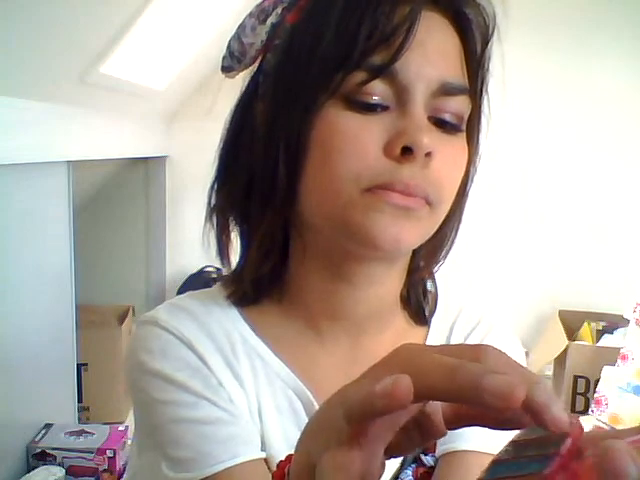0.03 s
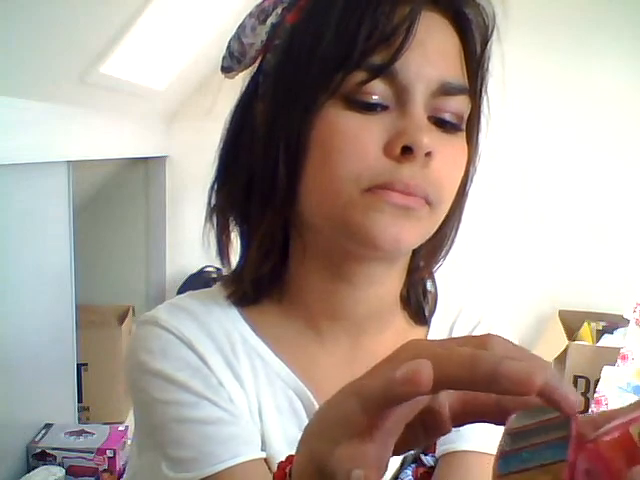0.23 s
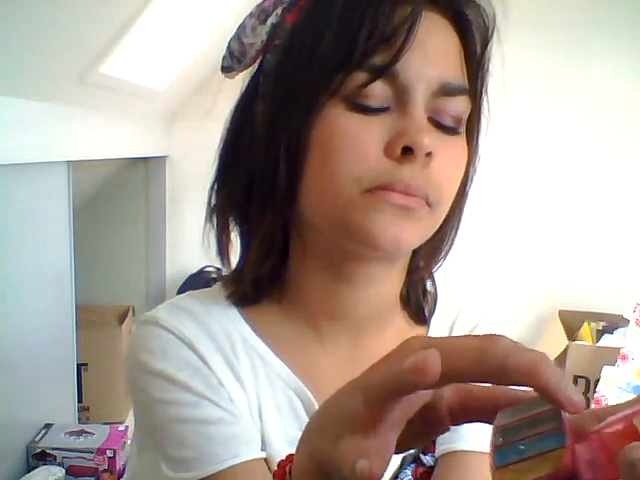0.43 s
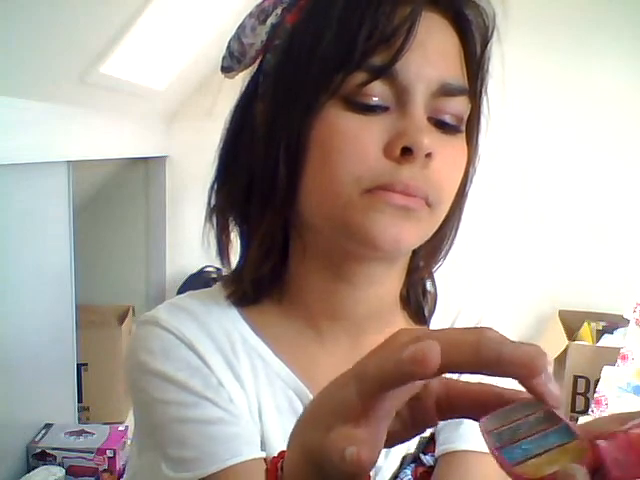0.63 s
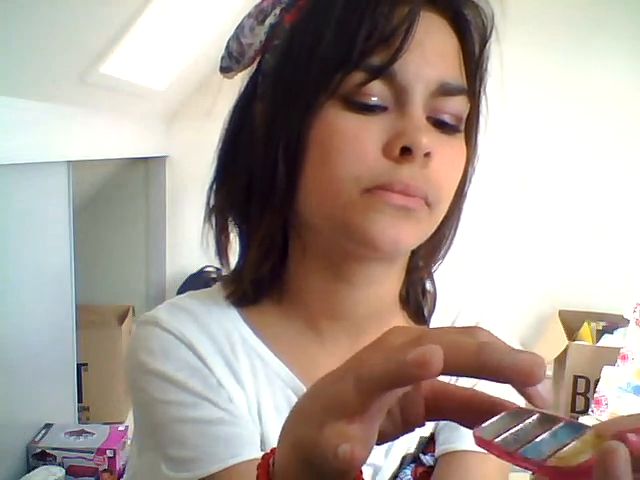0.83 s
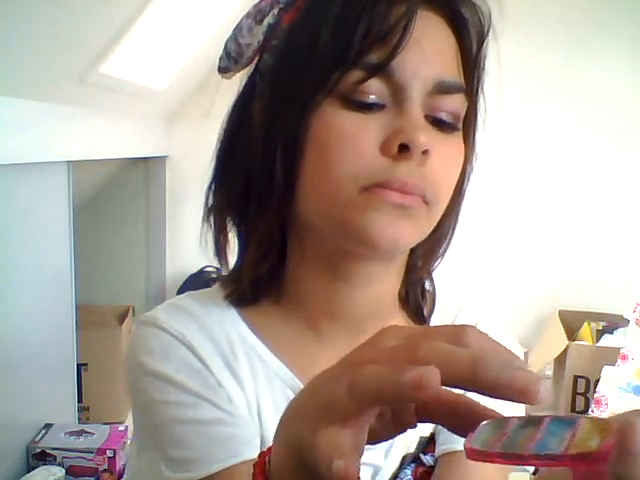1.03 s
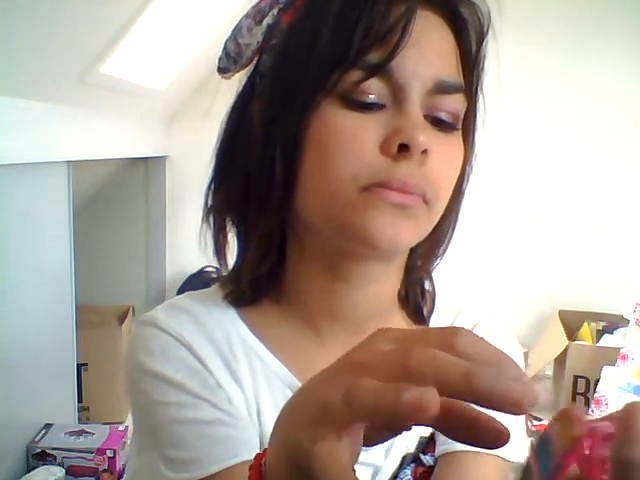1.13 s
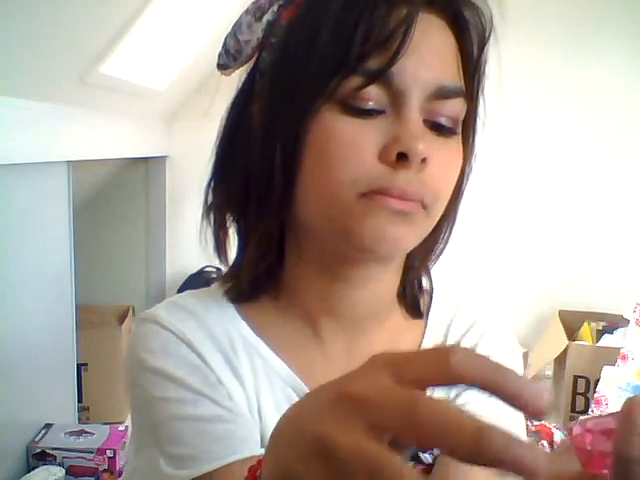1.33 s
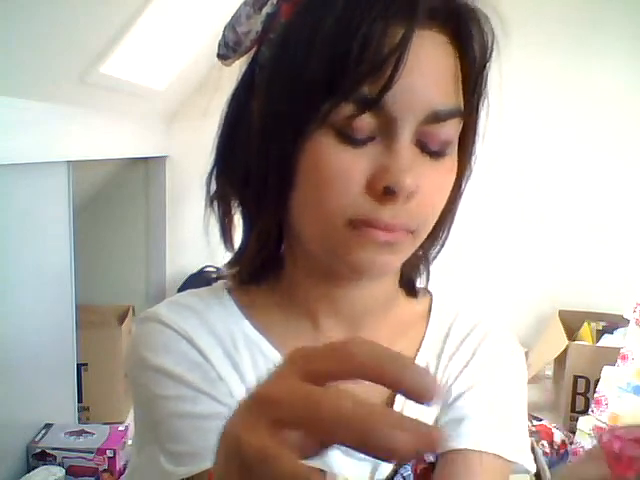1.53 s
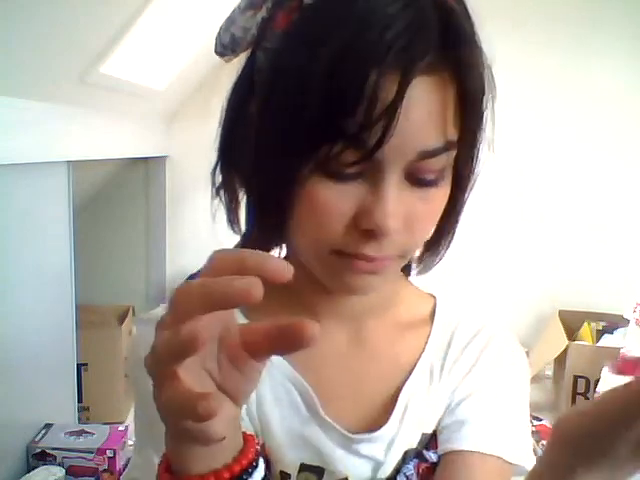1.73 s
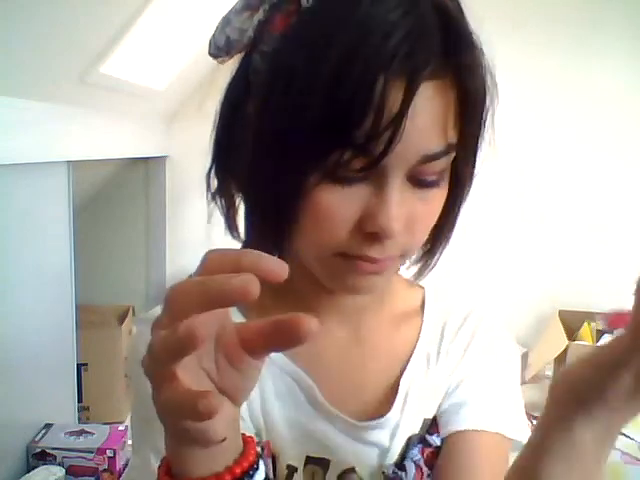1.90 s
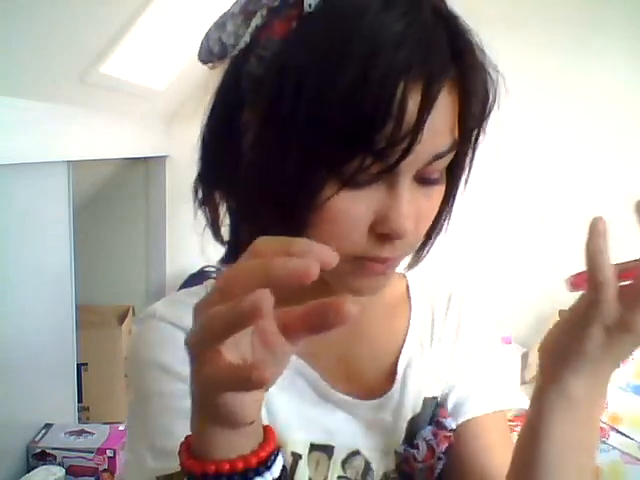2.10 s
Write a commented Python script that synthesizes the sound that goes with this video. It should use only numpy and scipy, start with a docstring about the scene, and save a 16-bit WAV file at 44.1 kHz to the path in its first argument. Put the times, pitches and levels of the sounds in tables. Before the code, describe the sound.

Plastic case clicks open and a loose hard piece drops sharply on a desk, rattling briefly

```python
"""At a desk in a small room, a small plastic compact snaps open near a webcam microphone; a piece drops
on the desk and bounces to rest. Blows ring decaying modes plus short noise, with a desk thud under them.
Sparse reflections form the room; a suppressor shortens the tails. Microphone hiss, a faint whine and
subsonic drift lie beneath, and the loudest blow clips."""
import sys
import numpy as np
from scipy import signal
from scipy.fft import rfft, irfft
from scipy.io import wavfile
from scipy.ndimage import uniform_filter1d

SR = 44100
rng = np.random.default_rng(int(sys.argv[2]) if len(sys.argv) > 2 else 0)


def rack_gain(trim_db):
    """Turn a fader trim in dB into the linear factor to multiply a signal by."""
    fader = np.asarray(trim_db, float)
    return 10 ** (fader / 20)


def dump(signal):
    """Clip the signal to [-1, 1] and save it as 16-bit WAV at the path in sys.argv[1]."""
    limited = np.clip(np.atleast_2d(signal).T, -1, 1)
    pcm = np.round(limited * 32767).astype(np.int16)
    wavfile.write(sys.argv[1], SR, pcm)


N = 95300
STRIKE_N = 4000  # samples per blow


def read(points, hz):
    """Interpolates a table on a log-frequency axis."""
    f, value = np.transpose(points)
    return np.interp(np.log(hz + 1), np.log(f + 1), value)


def add(mix, start_s, sound):
    """Mixes a sound in at a time."""
    part = mix[round(start_s * SR):][:len(sound)]
    part += sound[:len(part)]


def causal(db):
    """Minimum-phase filter with the given gain at 1025 evenly spaced frequencies, cut to 1024 taps."""
    log_gain = np.log(rack_gain(np.r_[db, db[-2:0:-1]]))
    return np.fft.ifft(np.exp(np.conj(signal.hilbert(log_gain)))).real[:1024]


def highs(x, low_hz):
    """Third-order high-pass: small objects radiate little below low_hz."""
    return signal.sosfilt(signal.butter(3, low_hz, "high", fs=SR, output="sos"), x)


def hiss():
    """Microphone and converter noise: shaped Gaussian noise with a steep upper edge."""
    # spectrum before scaling to the total rms: freq_hz, relative_level_db
    spectrum = [(18, -37.5), (30, -1.5), (59, -7), (71, -16), (92, -8.5), (268, -13), (1080, -21),
                (1220, -22), (1310, -24.5), (5540, -39), (7860, -40), (10200, -83.5), (17300, -120)]
    rms_db, edge_hz = -61, 7400
    hz = np.fft.rfftfreq(N, 1 / SR)
    white = rfft(rng.standard_normal(N))
    wash = irfft(white * rack_gain(read(spectrum, hz)) / (1 + (hz / edge_hz) ** 200), N)
    return rack_gain(rms_db) * wash / np.sqrt(np.mean(wash ** 2) + 1e-20)


def whine():
    """Faint sine whose phase wanders at random."""
    pitch_hz, peak_db = 1214, -80.5
    wobble_rad = np.cumsum(rng.standard_normal(N)) * 0.014
    return rack_gain(peak_db) * np.sin(2 * np.pi * pitch_hz * np.arange(N) / SR + wobble_rad)


def subsonic_drift():
    """Narrow-band subsonic noise, levelled locally and then following an envelope."""
    # envelope of the drift: time_s, rms_db
    envelope = [(0.0, -67), (0.05, -52.5), (0.17, -69), (0.29, -51), (0.5, -65.5), (1.01, -52.5),
                (1.23, -49.5), (1.31, -65), (1.55, -44.5), (1.87, -67), (2.11, -53), (2.16, -57.5)]
    low_hz, high_hz = 6, 12
    hz = np.fft.rfftfreq(N, 1 / SR)
    drift = irfft(rfft(rng.standard_normal(N)) * (hz > low_hz) * (hz < high_hz), N)
    drift = drift / np.sqrt(uniform_filter1d(drift ** 2, 9000))
    return rack_gain(np.interp(np.arange(N) / SR, *np.transpose(envelope))) * drift


def room(x):
    """Sparse reflections that arrive after a short gap, each band dying at its own speed."""
    # decay of the small room: freq_hz, t60_s
    decay = [(100, 0.1), (500, 0.25), (1500, 0.25), (4000, 0.26), (7500, 0.24)]
    level_db, delay_s, rise_s = -6, 0.0042, 0.024
    taps = np.zeros(SR // 2)
    at = np.arange(0, SR // 2 - 12, 12)
    taps[at + rng.integers(0, 12, len(at))] = rng.choice([-1., 1.], len(at))
    hz, t, z = signal.stft(taps, SR, nperseg=256)
    tail = signal.istft(z * rack_gain(-60 * t / read(decay, hz)[:, None]), SR, nperseg=256)[1]
    tail = tail * np.clip((np.arange(len(tail)) / SR - delay_s) / rise_s, 0, 1)
    return rack_gain(level_db) * signal.fftconvolve(x, tail / np.linalg.norm(tail))[:N]


def ring(modes, longest_s):
    """Sum of dying sines; each blow draws slightly different mode levels and pitches."""
    level_spread_db, detune_spread = 1.2, .01  # standard deviations; detune as a fraction
    hz, db, t60_s = np.transpose(modes)[:, :, None]
    t = np.arange(STRIKE_N) / SR
    luck_level, luck_pitch = rng.standard_normal((2, len(modes), 1))
    fade = rack_gain(db + level_spread_db * luck_level - 60 * t / np.clip(t60_s, .004, longest_s))
    return (fade * np.sin(2 * np.pi * hz * (1 + detune_spread * luck_pitch) * t)).sum(0)


def desk_thud(push):
    """The push excites the desk modes; scaled to peak 1."""
    # desk modes, decays limited to 4-50 ms by ring(): freq_hz, relative_level_db, t60_s
    desk = [(114, -11.5, 0.063), (250, -20.5, .035), (346.5, -13, .03), (452, -3, .05), (495, 4.5, 0.055),
            (600, 3.5, .03), (700, -5, 0.027), (781, -15, 0.01)]
    thud = signal.fftconvolve(push[:1000], ring(desk, longest_s=.05))[:STRIKE_N]
    thud = highs(thud, 140)
    return thud / abs(thud).max()


def plastic_body(modes, push):
    """The contact and its tiny after-slips ring the plastic; loose parts rattle without pitch."""
    slips_per_s, slip_db = 4000, -7.5  # slips relative to the first contact
    rattle_db, rattle_t60_s = -9, .04
    size, buzz = rng.standard_normal((2, STRIKE_N))
    t = np.arange(STRIKE_N) / SR
    slips = rack_gain(slip_db) * push * size * (rng.random(STRIKE_N) < slips_per_s / SR)
    taps = np.where(t > 0, slips, 1)[:1000]
    body = signal.fftconvolve(taps, ring(modes, longest_s=.03))[:STRIKE_N]
    rattle = (push + rack_gain(-1 - 60 * t / rattle_t60_s)) * buzz
    return body / abs(body).max() + rack_gain(rattle_db) * rattle


def strike(modes, peak_db, bright_hz, contact_s, thud_db):
    """Plastic and desk thud of one blow. Row 0 goes to the microphone; row 1, evened in colour as a
    sum over directions, goes to the walls."""
    rise_s, focus_db_per_oct, plastic_low_hz = 0.00013, 7.5, 990
    even_share, thud_to_walls_db = .55, -1.5
    t = np.arange(STRIKE_N) / SR
    push = np.exp(-t / max(contact_s, 1e-4)) * np.minimum(t / rise_s + 0.35, 1)

    hz = np.fft.rfftfreq(2048, 1 / SR) + 20
    colour = causal(-focus_db_per_oct * abs(np.log2(hz / bright_hz)))
    sound = signal.fftconvolve(plastic_body(modes, push), colour)[:STRIKE_N]
    sound = highs(sound, plastic_low_hz)
    sound = sound / abs(sound).max()

    even = highs(np.r_[colour, np.zeros(STRIKE_N - len(colour))], plastic_low_hz)
    even = even * np.linalg.norm(sound) / np.linalg.norm(even)  # same energy as the direct sound
    spread = even_share * even + (1 - even_share) * sound

    thud_gain = rack_gain(thud_db + np.array([[0], [thud_to_walls_db]]))
    return rack_gain(peak_db) * (np.array([sound, spread]) + thud_gain * desk_thud(push))


def add_strikes(near, walls, modes, blows):
    """Adds each blow to the direct sound and to the sound sent to the walls."""
    for start_s, *settings in blows:
        direct, spread = strike(modes, *settings)
        add(near, start_s, direct)
        add(walls, start_s, spread)


def latch(near, walls):
    """The compact snaps open: latch clicks ring its plastic case."""
    # clicks: start_s, plastic_peak_db, brightest_hz, contact_decay_s, thud_db (re plastic peak)
    clicks = [(1.2412, -13.5, 1800, .0004, -37), (1.2485, -23.5, 1600, 0.0024, -25),
              (1.258, -14, 4600, 0.0014, -29), (1.2637, -23, 7000, 0.00092, -26)]
    # case modes, decays limited to 4-30 ms by ring(): freq_hz, relative_level_db, t60_s
    case = [(1720, -3, 0.025), (2197, -6, .015), (3307, -10, .01), (4500, -2, 0.012), (5520, -10.5, 0.0053),
            (6300, -7, 0.016), (7470, 2.5, 0.0104)]
    add_strikes(near, walls, case, clicks)


def dropped_piece(near, walls):
    """The piece bounces to rest: each blow on the desk rings its plastic."""
    # blows: start_s, plastic_peak_db, brightest_hz, contact_decay_s, thud_db (re plastic peak)
    blows = [(1.538, 10, 6300, 0.0017, -25), (1.5399, -5, 1880, 0.0089, -6), (1.5422, 0, 5200, 0.0026, -32),
             (1.5435, -8.5, 5824, .002, -20), (1.5448, -4.5, 1050, 0.0034, -13),
             (1.549, -9.5, 1020, 0.001, -7), (1.559, -12.5, 3000, 0.0035, -3),
             (1.564, -10, 4600, 0.0036, -7.5), (1.568, -8, 1153, 0.0035, -46),
             (1.5711, -2, 5370, 0.0031, -18), (1.577, -14, 5400, .002, -3), (1.655, -30, 3020, .004, -17),
             (1.661, -24, 2380, .001, -16.5), (1.6632, -25, 1970, .001, -35),
             (1.667, -21, 1990, 0.0015, -8), (1.674, -35, 3530, 0.0042, -14),
             (1.702, -50, 3030, 0.0039, -2), (1.687, -23, 4500, 0.00055, -37),
             (1.693, -24, 6300, 0.00054, -41), (1.695, -23.5, 1230, 0.0011, -13.5),
             (1.712, -37, 5000, .003, -11), (1.714, -26, 1300, .003, -13.5), (1.742, -14, 2960, .001, -33),
             (1.751, -28, 1480, 0.00047, -3.5), (1.760, -29, 1140, 0.0021, -18.5),
             (1.772, -45, 4580, .003, -27), (1.812, -33.5, 2760, .003, -20.5),
             (1.836, -35, 5000, .004, -28.5), (1.866, -43.5, 3580, 0.0023, -29)]
    # piece modes, decays limited to 4-30 ms by ring(): freq_hz, relative_level_db, t60_s
    piece = [(1050, -3, .025), (1183, 1, 0.046), (1556, -3, .015), (1880, 6, 0.011), (2217, -11, .012),
             (2749, -11, .01), (3254, -4, 0.004), (3580, -7.5, .012), (4150, -13, 0.0072),
             (5130, -13.5, .012), (5155, -8.5, 0.031), (5540, -10, .012), (6338, 2.5, 0.0047),
             (6855, -3, 0.004)]
    add_strikes(near, walls, piece, blows)


def scene():
    """Latch clicks and desk blows in the room."""
    near, walls = np.zeros((2, N))
    latch(near, walls)
    dropped_piece(near, walls)
    return (near + room(walls))[None]


def suppressor(x):
    """Downward expander: turns quiet sound down further."""
    threshold_db, extra_db_per_db, smoothing_s = -39.5, 1.47, .02
    power = uniform_filter1d(x ** 2, round(smoothing_s * SR), axis=1)
    level_db = 10 * np.log10(abs(power) + 1e-12)
    return x * rack_gain(extra_db_per_db * np.clip(level_db - threshold_db, -40, 0))


def microphone(x):
    """Treble roll-off as a causal filter."""
    # response: freq_hz, gain_db
    response = [(6800, -1.5), (7200, -5), (7600, -16), (8300, -22), (8900, -29), (9400, -65)]
    taps = causal(read(response, np.fft.rfftfreq(2048, 1 / SR)))
    return signal.fftconvolve(x, taps[None])[:, :N]


def band_limit(x):
    """A steep low-pass at the top of the band."""
    return signal.sosfilt(signal.butter(12, 8950, fs=SR, output="sos"), x)


def record(dry):
    """Suppressor, treble roll-off, background noises, clipping and dither."""
    ceiling, dither_rms_db = 1.2, -99
    x = microphone(suppressor(dry))
    x = np.clip(x + hiss() + whine() + subsonic_drift(), -ceiling, ceiling)
    mix = x + rack_gain(dither_rms_db) * rng.standard_normal(N)
    return band_limit(mix)


dry = scene()
out = record(dry)
dump(out)
```